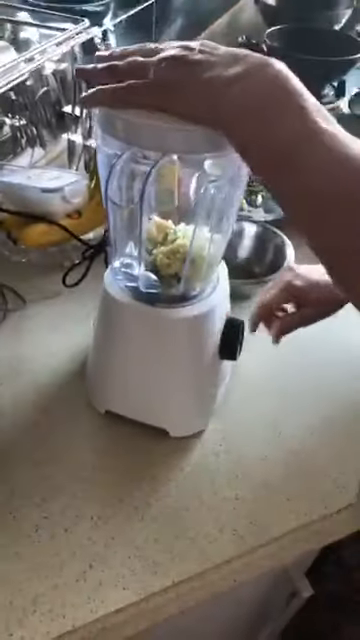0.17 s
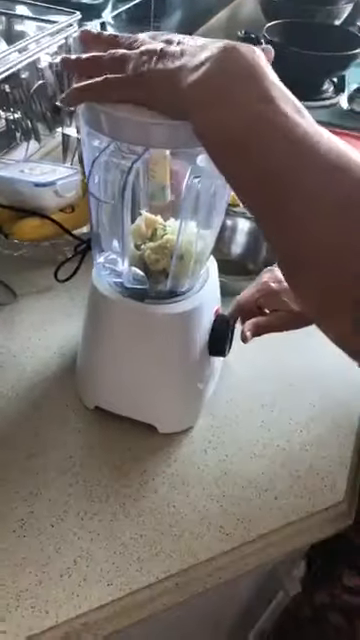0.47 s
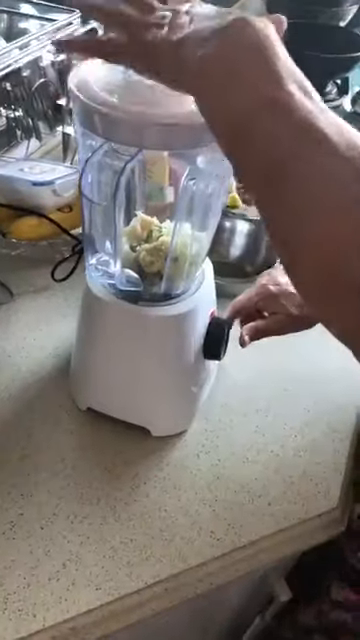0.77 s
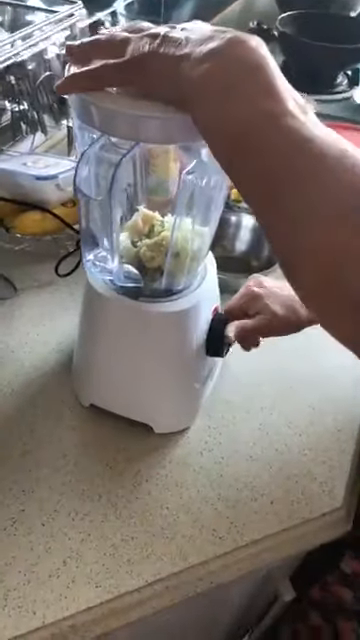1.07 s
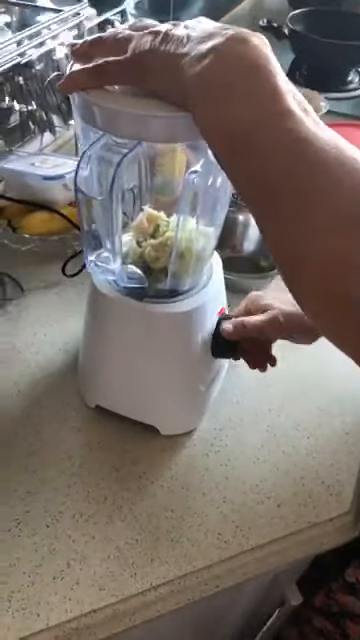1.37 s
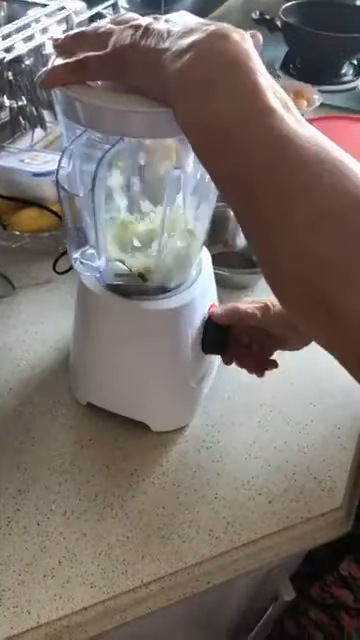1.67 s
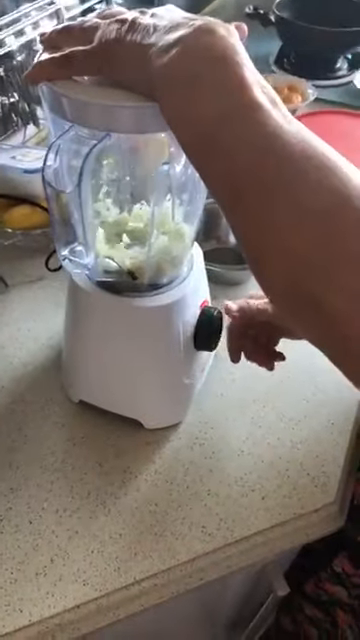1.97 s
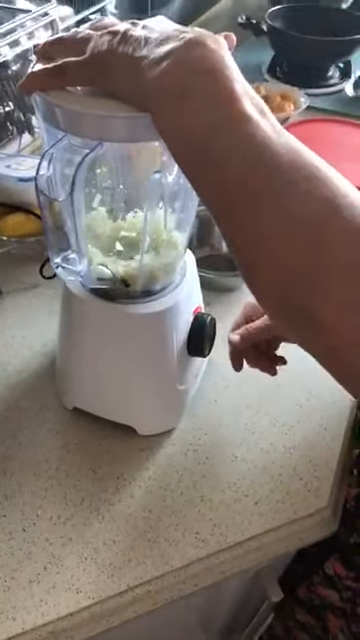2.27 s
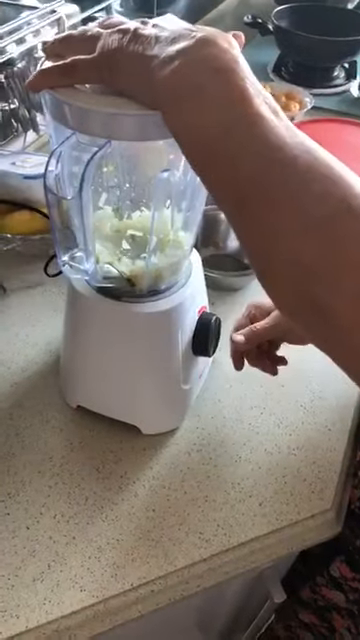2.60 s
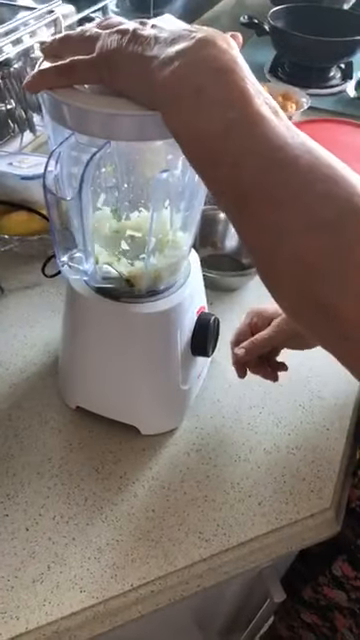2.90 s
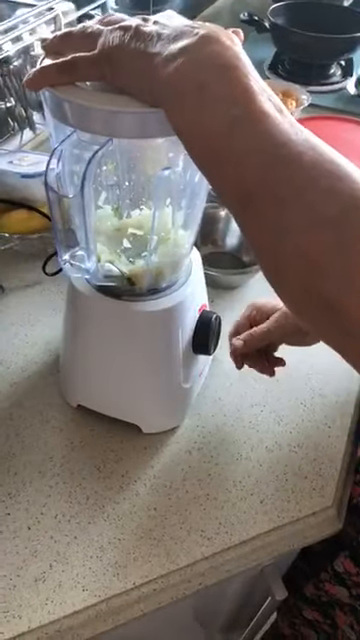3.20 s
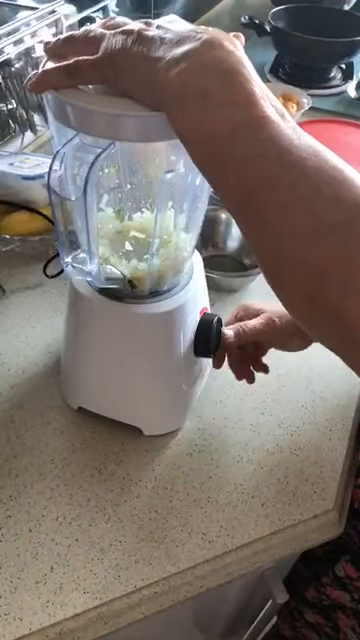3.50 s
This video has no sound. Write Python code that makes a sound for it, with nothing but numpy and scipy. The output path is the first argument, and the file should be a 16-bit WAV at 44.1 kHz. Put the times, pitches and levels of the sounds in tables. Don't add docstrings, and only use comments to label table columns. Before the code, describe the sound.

A blender starts up in a home kitchen, heard close. Low rumble and distant fan rush; fingers tap the lid at 0.05 s, skin swishes near 0.55, a soft palm pat at 0.85. At 1.47 a sharp knob click and heavy jolt, then a raspy buzzing motor surges, squeals briefly around 1.7-1.9, and climbs to a loud hissing whine with ticking bits; a lump knocks the jar at 3.4.

```python
import sys
import numpy as np
from scipy import signal
from scipy.fft import rfft, irfft, next_fast_len
from scipy.io import wavfile
from scipy.ndimage import map_coordinates

SR = 44100
rng = np.random.default_rng(int(sys.argv[2]) if len(sys.argv) > 2 else 0)


def volts_from_decibels(level):
    exponent = np.asarray(level, float) / 20
    return 10 ** exponent


def digitize_waveform(pressure):
    field = np.atleast_2d(pressure).T
    bounded = np.clip(field, -1, 1)
    quanta = np.round(bounded * 32767).astype(np.int16)
    wavfile.write(sys.argv[1], SR, quanta)


N = 160965
T = np.arange(N) / SR

SWITCH_ON_S = 1.473
MAINS_HZ = 50
TOP_HZ = 258.6


def unit(x):
    return x / np.sqrt(np.mean(x ** 2) + 1e-20)


def along(points, hz):
    f, v = np.transpose(points)
    return np.interp(np.log(hz + 1), np.log(f + 1), v)


def wobble(rate):
    knots = rng.standard_normal(int(N * 400 / SR) + 4)
    return map_coordinates(knots, [np.arange(N) * min(rate, 400) / SR])


def filtered(x, response):
    m = next_fast_len(N + SR // 2)
    return irfft(rfft(x, m) * response(np.fft.rfftfreq(m, 1 / SR)), m)[..., :N]


def resonances(table):
    def response(f):
        total = 0
        for k, (centre, width, db) in enumerate(table):
            damping = 1j * f * width
            total = total + (-1) ** k * volts_from_decibels(db) * damping / (centre * centre - f * f + damping)
        return total
    return response


def window(start, stop, fade):
    return np.clip(np.minimum(T - start, stop - T) / fade + .5, 0, 1)


def tone(hz, blur_hz):
    wandering = hz + blur_hz * wobble(3 * blur_hz)
    return np.sqrt(2) * np.sin(2 * np.pi * np.cumsum(wandering) / SR)


def noise(response):
    return unit(filtered(rng.standard_normal(N), response))


# (frequency [Hz], level [dB per Hz])
RUMBLE_COLOUR = [(18, -20), (38, 6), (64, 8), (82, -2.5), (160, -0.5), (330, -5.5), (700, -23.5),
                 (2000, -70)]
# (frequency [Hz], level [dB per Hz])
FAN_RUSH = [(300, -17), (500, 5.5), (800, -4.5), (1200, -5), (2000, -7.5), (2500, -15), (8000, -28.5),
            (15700, -47)]
# (frequency [Hz], level [dB rms], blur [Hz])
FAN_HUM = [(151.4, -52.5, 12), (446, -50.5, 20), (61.7, -51, 20)]


def room_tone():
    rumble = volts_from_decibels(-43.5 + wobble(3.85)) * noise(lambda f: volts_from_decibels(along(RUMBLE_COLOUR, f)))
    rush = volts_from_decibels(-47.5 + 0.32 * wobble(3.8)) * noise(lambda f: volts_from_decibels(along(FAN_RUSH, f)))
    hum = sum(volts_from_decibels(db + 2.3 * wobble(9.62)) * tone(hz, blur) for hz, db, blur in FAN_HUM)
    return rumble + rush + hum


def knock(event, modes):
    start, db, crack_db = event
    t = np.maximum(T - start, 0)
    ring = 0
    for hz, level, t60, width in modes:
        if width > 30:
            voice = 0.77 * noise(lambda f: resonances([(hz, width, 0)])(f) ** 2)
        else:
            voice = np.sin(2 * np.pi * hz * t)
        ring = ring + volts_from_decibels(level - 60 * t / t60) * voice
    crack = volts_from_decibels(crack_db - 60 * t / 0.028) * noise(lambda f: f / (f + 800) / (1 + (f / 9000) ** 3))
    attack = 1 - np.exp(-t / 0.00073)
    return volts_from_decibels(db - 4.5) * (ring + crack) * attack


# (frequency [Hz], level [dB], t60 [s], width [Hz]: 0 rings clean, wide rattles)
LID_TAP = (.049, -26.5, -16)
LID_TAP_MODES = [(570, 5.5, 0.025, 300), (1240, 2, 0.022, 0), (1520, -11, 0.18, 0), (1620, -6, .16, 0),
                 (1520, 1.5, 0.16, 450), (2265, 5.5, 0.02, 0), (4300, -9.5, 0.046, 1100),
                 (8000, -20, .02, 1500)]
LID_PAT = (.854, -21, -24)
LID_PAT_MODES = [(415, -1, .17, 0), (484, -6, .1, 0), (560, -7, .06, 0), (720, -3, .035, 0),
                 (1050, -10, .05, 0), (1460, -12, .08, 0), (2300, -16, .04, 600)]
KNOB_CLICK = (1.473, -17.5, 0)
KNOB_CLICK_MODES = [(1130, -16, 0.025, 300), (2340, 1, 0.057, 1100), (5450, 1, 0.035, 1400),
                    (7900, 0, 0.016, 2800)]
BASE_JOLT = (1.480, -6, -18)
BASE_JOLT_MODES = [(490, -3, .04, 0), (575, -1, .035, 0), (780, -1, .04, 0), (1060, -7, .03, 0)]
JAR_LUMP = (3.378, -15.5, -2)
JAR_LUMP_MODES = [(5000, 2, 0.058, 3400), (9570, -2, 0.037, 620), (13400, -14, .03, 400)]


def knocks():
    return (knock(LID_TAP, LID_TAP_MODES) + knock(LID_PAT, LID_PAT_MODES)
            + knock(KNOB_CLICK, KNOB_CLICK_MODES) + knock(BASE_JOLT, BASE_JOLT_MODES)
            + knock(JAR_LUMP, JAR_LUMP_MODES))


# (frequency [Hz], t60 [s])
KITCHEN_DECAY = [(200, 0.51), (2000, 0.4), (10000, 0.09)]


def kitchen(x):
    hz, t, z = signal.stft(rng.standard_normal(SR // 2), SR, nperseg=256)
    decay = volts_from_decibels(-60 * t / along(KITCHEN_DECAY, hz)[:, None])
    tail = signal.istft(z * decay, SR, nperseg=256)[1]
    late = np.pad(x, (300, 0))
    return signal.fftconvolve(late, tail / np.linalg.norm(tail))[:N]


# (peak time [s], level [dB], rise [s], fall [s], centre [Hz],
# width [Hz])
PALM_RUBS = [
    (.529, -56, .004, .003, 7000, 9000),
    (.542, -53, .045, .04, 5000, 5000),
    (.605, -54, .02, .07, 4000, 2000),
    (.847, -62, .003, .01, 6000, 6000),
    (.864, -55.5, .006, .045, 5500, 6000),
    (.055, -59, .004, .03, 4000, 4000),
    (1.25, -68, .2, .15, 3500, 3000),
    (1.508, -35, .004, .012, 3000, 5000),
]


def rubs():
    out = 0
    for peak, db, rise, fall, hz, width in PALM_RUBS:
        swell = np.exp(-np.where(T < peak, (peak - T) / rise, (T - peak) / fall))
        grain = volts_from_decibels(db + 1.2 * wobble(150))
        out = out + grain * swell * noise(resonances([(hz, width, 0)]))
    return out


# (frequency [Hz], level [dB rms], from [s], until [s], blur [Hz])
SQUEAL_EVENTS = [
    (7570, -44, 1.66, 1.685, 30),
    (7860, -39, 1.678, 1.722, 40),
    (9330, -45, 1.818, 1.845, 30),
    (8900, -45, 1.843, 1.865, 30),
    (9660, -44, 1.85, 1.89, 30),
    (3930, -69, .55, .6, 30),
    (3930, -65, .695, .742, 10),
]


def squeals():
    return sum(volts_from_decibels(db) * window(start, stop, 0.011) * tone(hz, blur)
               for hz, db, start, stop, blur in SQUEAL_EVENTS)


def shaft_speed():
    fast_hz, fast_s, slow_s = 154, .115, .53
    since = np.maximum(T - SWITCH_ON_S, 0)
    return TOP_HZ - fast_hz * np.exp(-since / fast_s) - (TOP_HZ - fast_hz) * np.exp(-since / slow_s)


def mains_current():
    lag_s, sharpness = 0.00339, 8.4
    ripple = np.cos(2 * np.pi * MAINS_HZ * (T - lag_s))
    return ripple, np.exp(sharpness * (ripple - 1))


# (time [s], kick level [dB], housing roar level [dB], air hiss level [dB])
MOTOR_EFFORT = [(1.481, -19, -37, -30), (1.52, -31.5, -25.5, -30), (1.57, -25.5, -26.5, -33),
                (1.63, -28.5, -24, -31), (1.68, -27, -22.5, -27.5), (1.9, -29, -23, -28.5),
                (2.1, -28, -22.5, -25.5), (2.3, -32, -23, -25), (2.55, -29, -23.5, -24.5),
                (2.85, -49, -27.5, -24), (3.1, -32, -23.5, -25), (3.35, -35.5, -26.5, -24),
                (3.65, -34, -26.5, -24)]


def effort():
    s, *levels = np.transpose(MOTOR_EFFORT)
    return [volts_from_decibels(np.interp(T, s, db)) for db in levels]


# (frequency [Hz], width [Hz], level [dB])
BASE_MODES = [(418, 107, -4), (515, 112, 0), (826, 98, -9.5)]


def mains_kicks(current):
    beats = np.zeros(N)
    at = np.arange(int(N / SR * MAINS_HZ)) / MAINS_HZ + 0.00339 - .002
    at = at + .0003 * rng.standard_normal(len(at))
    beats[(at * SR).astype(int)] = 1
    brush_noise = unit(current * rng.standard_normal(N))
    shove = volts_from_decibels(1.3 * wobble(30)) * (unit(beats) + .2 * brush_noise)
    return unit(filtered(shove, lambda f: resonances(BASE_MODES)(f) / (1 + 1j * f / 2500) ** 2))


# (frequency [Hz], width [Hz], level [dB])
JAR_MODES = [(500, 142, -6.5), (780, 71, -3), (1097, 170, -1), (1597, 157, -1.5), (2120, 440, -6),
             (2480, 530, -11)]
# (frequency [Hz], level [dB])
ROAR_COLOUR = [(60, -30), (150, 7), (300, 4), (500, -0.5), (4000, -9.5), (8000, -11)]


def housing_roar(ripple):
    colour = noise(lambda f: resonances(JAR_MODES)(f) * volts_from_decibels(along(ROAR_COLOUR, f)))
    return (1 + 0.037 * ripple) * volts_from_decibels(0.52 * wobble(20)) * colour


# (frequency [Hz], level [dB per Hz])
AIR_COLOUR = [(1060, -17.5), (1800, -2.5), (2630, -7.5), (2990, -7), (3520, -8), (5790, -6.5),
              (10200, -17.5), (11500, -20), (15700, -29.5)]
# (frequency [Hz], width [Hz], lift [dB])
VENT_WHISTLES = [(4340, 170, 5), (5030, 310, 5), (5880, 150, 2), (8840, 530, 3)]


def air_hiss(ripple, fast):
    def vent_lift(f):
        return sum(db / (1 + ((f - hz) / w * 2) ** 2) for hz, w, db in VENT_WHISTLES)
    bright = noise(lambda f: volts_from_decibels(along(AIR_COLOUR, f) + vent_lift(f)))
    slow_tilt_db = -7
    dull = noise(lambda f: volts_from_decibels(along(AIR_COLOUR, f) + slow_tilt_db * np.log2(f / 4000 + 0.12) / 2))
    blend = np.sqrt(np.abs(1 - fast ** 4)) * dull + fast ** 2 * bright
    return (1 + 0.074 * ripple) * volts_from_decibels(0.62 * wobble(10)) * blend


def chopped_bits(fast):
    bits_per_s, db, spread_db = 250, -17, 3
    hits = rng.random(N) < bits_per_s / SR
    force = volts_from_decibels(db + spread_db * np.minimum(rng.exponential(1, N), 3))
    bits = hits * force * rng.choice([-1, 1], N)
    return fast * filtered(bits, resonances([(4530, 5000, 0), (1500, 900, 4)]))


# (shaft order, plus mains multiple, level [dB rms], from [s], until [s])
MAINS_BEATS = [
    (0, 2, -50, 1.48, 4),
    (0, 3, -48, 1.48, 4),
    (2, -3, -39, 2.7, 4),
    (2, -1, -37, 2.9, 4),
    (6, -1, -39, 2.95, 4),
    (6, 3, -29, 2.13, 2.21),
    (6, 2, -33, 2.21, 2.36),
    (7, 0, -33, 2.28, 2.34),
]


def mains_beats(speed):
    out = 0
    for order, multiple, db, start, stop in MAINS_BEATS:
        level = volts_from_decibels(db + 2 * wobble(25)) * window(start, stop, .04)
        out = out + level * tone(order * speed + multiple * MAINS_HZ, order + 2)
    return out


# (shaft order, level [dB rms], from [s], until [s], blur [Hz])
SHAFT_WHINE = [(1, -38, 2.52, 4, 2), (2, -32, 1.85, 2.26, 7), (2, -29.5, 2.26, 2.55, 5),
               (2, -26.5, 2.55, 2.75, 4), (2, -30.5, 2.75, 4, 3), (3, -37, 2.3, 2.54, 6),
               (3, -27.5, 2.54, 2.68, 2), (3, -25, 2.68, 2.9, 2), (3, -29, 2.9, 3.2, 3),
               (3, -27, 3.2, 4, 2), (5, -39, 3.0, 4, 4), (6, -31, 1.66, 1.74, 15), (6, -28, 1.74, 1.84, 12),
               (6, -32, 1.84, 1.97, 20), (6, -30.5, 2.38, 2.61, 8), (6, -24.5, 2.61, 2.71, 2),
               (6, -28.5, 2.71, 2.93, 4), (6, -25, 2.93, 3.4, 3), (6, -22.5, 3.4, 3.59, 2),
               (6, -26, 3.59, 4, 3), (7, -35, 2.56, 2.95, 4), (8, -40, 3.15, 3.5, 5),
               (12, -40, 1.84, 1.98, 8), (12, -32, 1.99, 2.1, 4), (12, -36, 2.1, 2.28, 5),
               (12, -33, 2.28, 2.4, 4), (12, -33, 2.4, 2.77, 3), (12, -44, 3.05, 3.35, 8),
               (24, -38.5, 1.86, 2.08, 150), (24, -41, 3.2, 4, 9), (48, -47, 1.9, 2.25, 450),
               (48, -46, 2.25, 2.85, 350)]


def shaft_whine(speed, current):
    pulse = 1 + .2 * unit(current - current.mean())
    out = 0
    for order, db, start, stop, blur in SHAFT_WHINE:
        level = volts_from_decibels(db + 1.1 * wobble(9)) * window(start, stop, .04)
        out = out + level * pulse * tone(order * speed, blur)
    return out


def jar_buzz(speed):
    level = volts_from_decibels(-34.5 + 2 * wobble(15)) * window(2.85, 9, .2)
    pulse = 1 + .9 * np.cos(2 * np.pi * MAINS_HZ * (T - .0016))
    return level * pulse * tone(4 * speed + 2 * MAINS_HZ, 8)


def motor():
    speed = shaft_speed()
    fast = speed / TOP_HZ
    ripple, current = mains_current()
    kick, roar, air = effort()
    out = kick * mains_kicks(current) + roar * housing_roar(ripple) + air * air_hiss(ripple, fast)
    out = out + chopped_bits(fast) + mains_beats(speed) + shaft_whine(speed, current) + jar_buzz(speed)
    ragged_db, ragged_hz = 2.2, 45
    ragged = ragged_db * rng.standard_normal(SR // 2 // ragged_hz + 2)
    out = filtered(out, lambda f: volts_from_decibels(np.interp(f / ragged_hz, np.arange(len(ragged)), ragged) * (f > 1800)))
    return out * window(SWITCH_ON_S + 0.0027, 9, 0.0046)


def scene():
    hands = knocks() + rubs() + squeals()
    mix = room_tone() + hands + volts_from_decibels(-9) * kitchen(hands) + motor()
    return np.tile(mix, (2, 1))


def top_cut(x):
    return signal.sosfilt(signal.butter(12, 16360, fs=SR, output="sos"), x)


# (low edge [Hz], high edge [Hz], from [s], until [s], level [dB])
TREBLE_HOLES = [(11900, 12800, 2.89, 3.47, -7), (12850, 13450, 2.0, 2.1, -8),
                (12850, 13450, 2.09, 2.17, -30), (12850, 13450, 2.17, 2.23, -10),
                (12850, 13450, 2.23, 3.65, -30), (13600, 14700, .9, 1.02, -20),
                (13600, 14700, 1.02, 1.3, -9), (13450, 14300, 2.91, 3.33, -30),
                (14300, 15800, 2.91, 3.31, -28), (14300, 15800, 3.45, 3.6, -16),
                (13500, 14700, 1.53, 1.64, -20)]
# (frequency [Hz], level [dB rms], from [s], until [s])
GLASSY_TONES = [
    (12562.5, -48, 2.89, 3.47),
    (13312.5, -60, 2.0, 3.65),
    (14062.5, -58, 2.89, 3.35),
    (14812.5, -54, 2.89, 3.62),
    (15562.5, -57, 2.8, 3.65),
    (14062.5, -82, .88, 1.3),
    (14062.5, -62, 1.5, 1.65),
    (14812.5, -59, 1.5, 1.94),
]


def record(dry):
    limited = dry[0] / (1 + np.abs(dry[0] / .55) ** 4) ** .25
    x = filtered(limited, lambda f: f < 15750)
    for low, high, start, stop, db in TREBLE_HOLES:
        band = filtered(x, lambda f: (f > low) & (f < high))
        x = x - (1 - volts_from_decibels(db)) * window(start, stop, .02) * band
    for hz, db, start, stop in GLASSY_TONES:
        x = x + volts_from_decibels(db + 2 * wobble(12)) * window(start, stop, .02) * tone(hz, 0.88)
    return top_cut(np.array([x, x]))


dry = scene()
out = record(dry)
digitize_waveform(out)
```